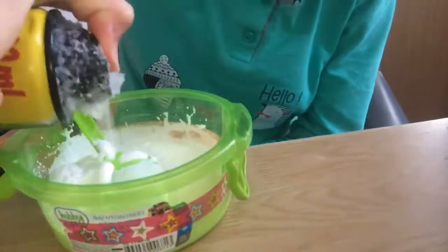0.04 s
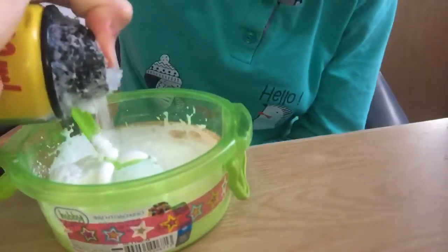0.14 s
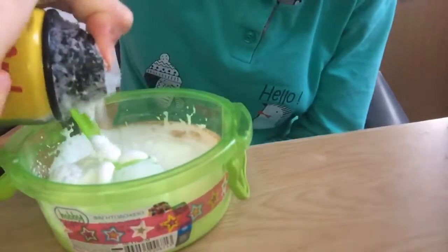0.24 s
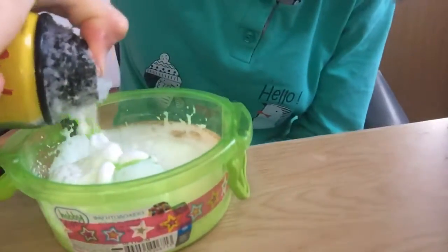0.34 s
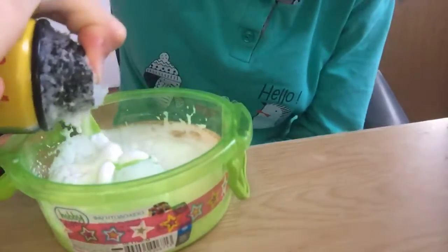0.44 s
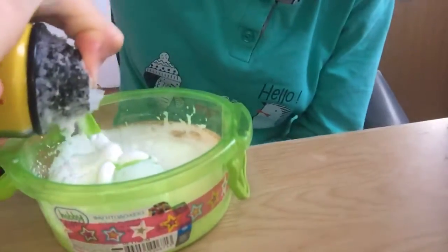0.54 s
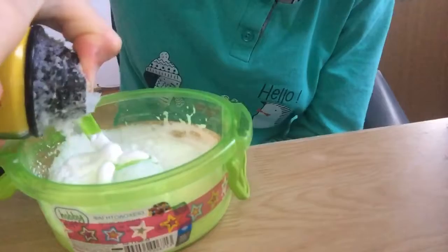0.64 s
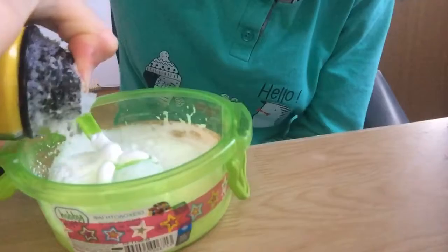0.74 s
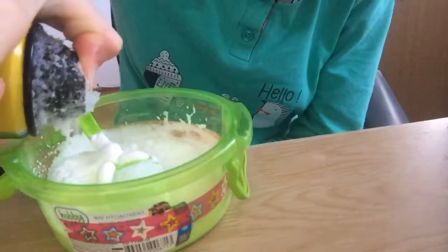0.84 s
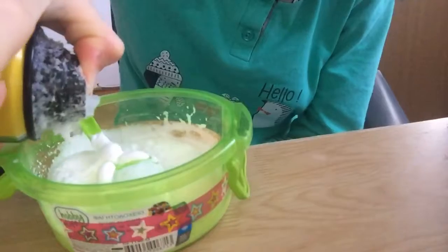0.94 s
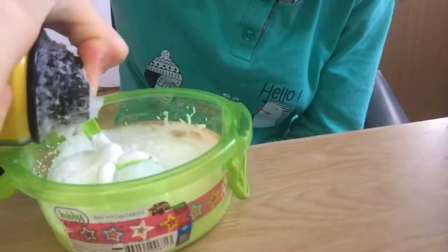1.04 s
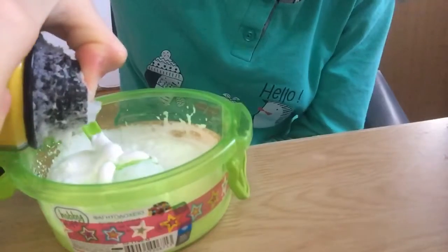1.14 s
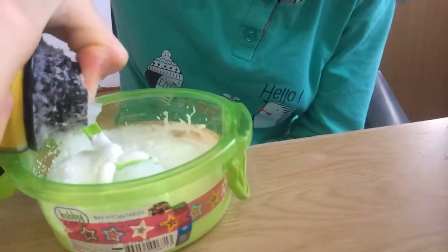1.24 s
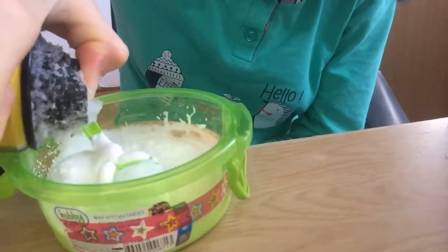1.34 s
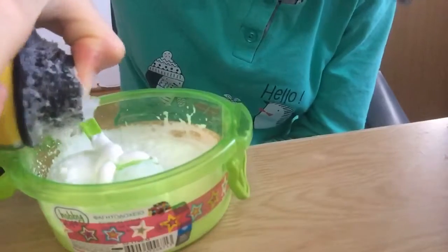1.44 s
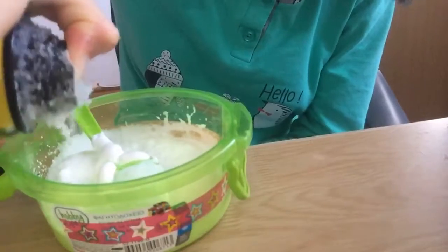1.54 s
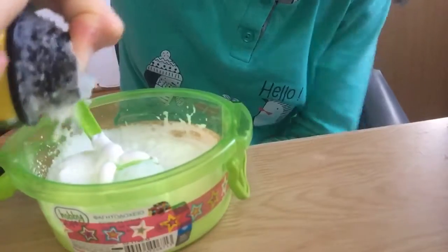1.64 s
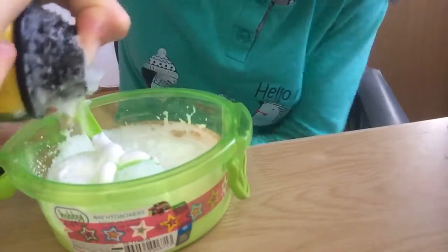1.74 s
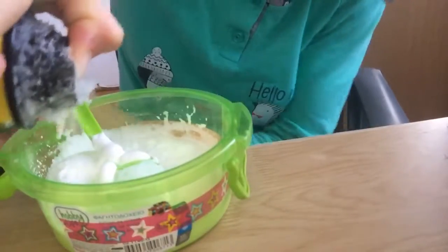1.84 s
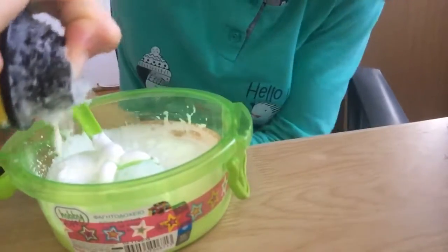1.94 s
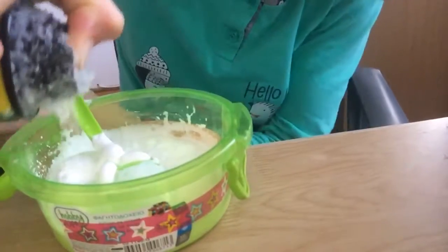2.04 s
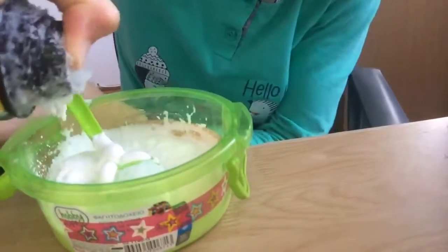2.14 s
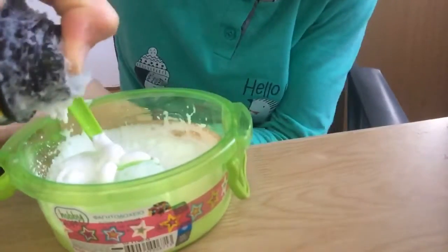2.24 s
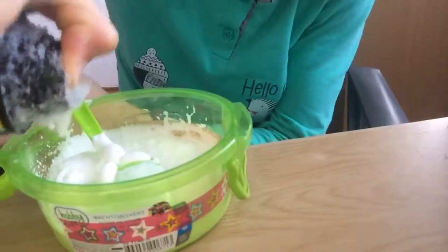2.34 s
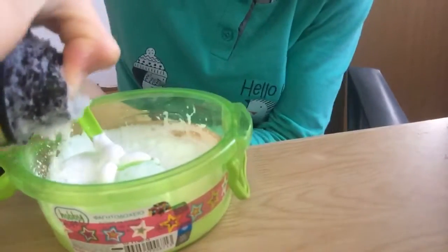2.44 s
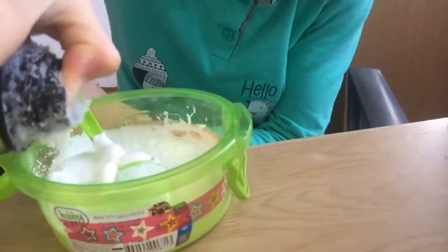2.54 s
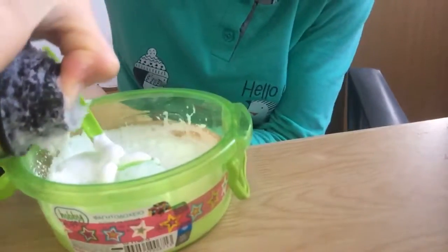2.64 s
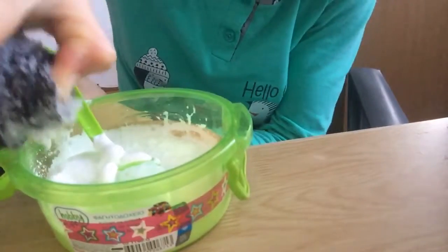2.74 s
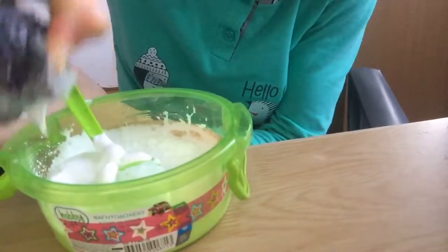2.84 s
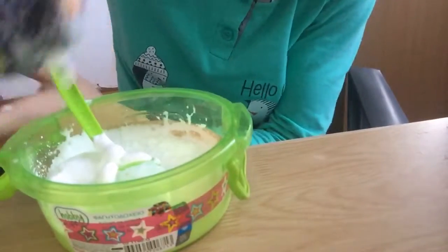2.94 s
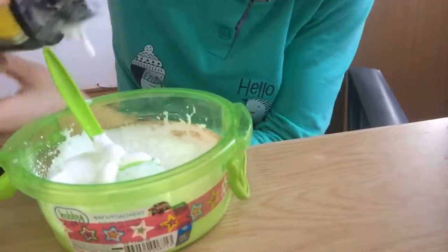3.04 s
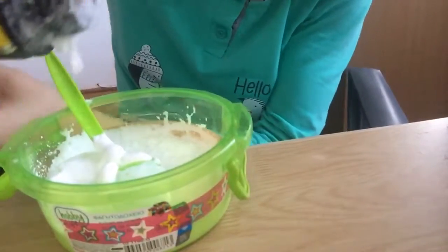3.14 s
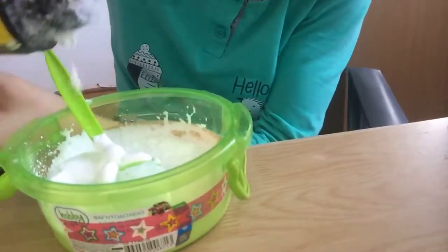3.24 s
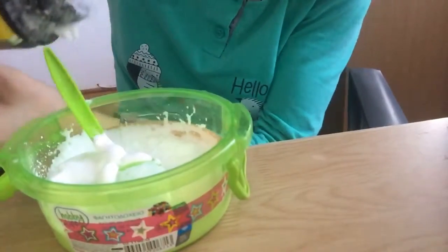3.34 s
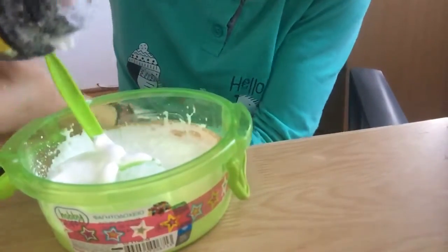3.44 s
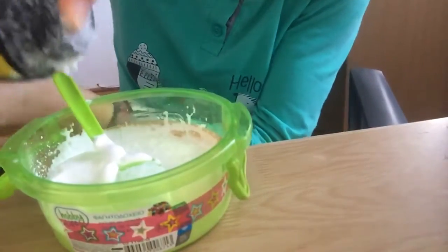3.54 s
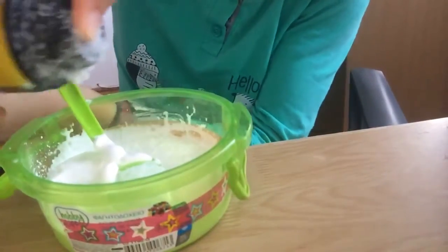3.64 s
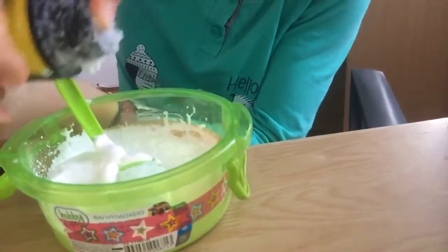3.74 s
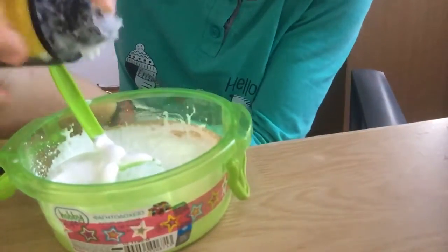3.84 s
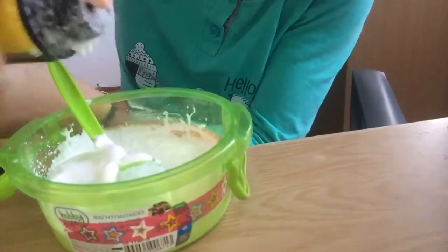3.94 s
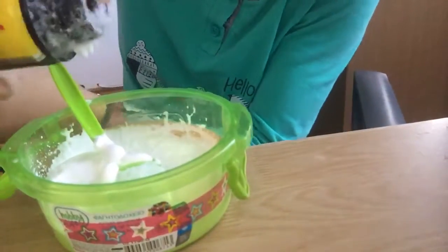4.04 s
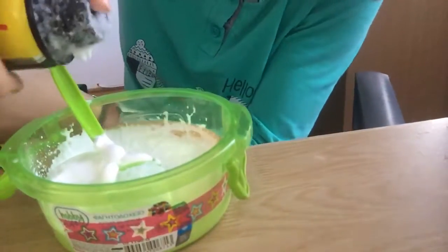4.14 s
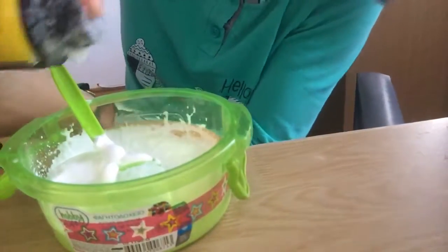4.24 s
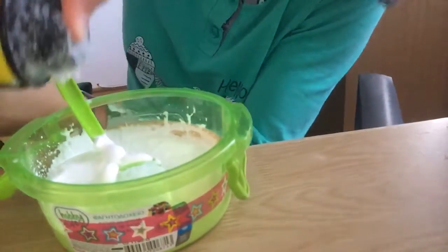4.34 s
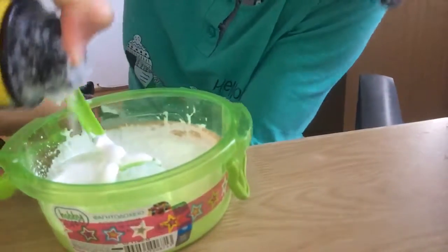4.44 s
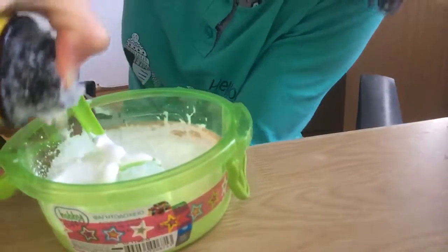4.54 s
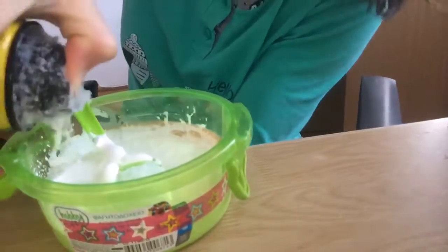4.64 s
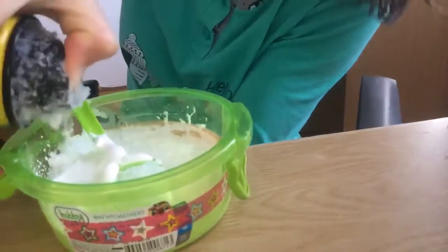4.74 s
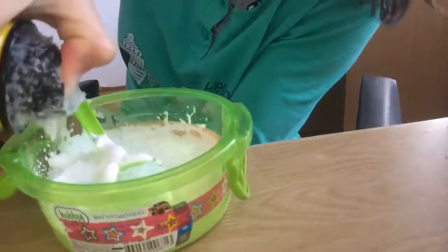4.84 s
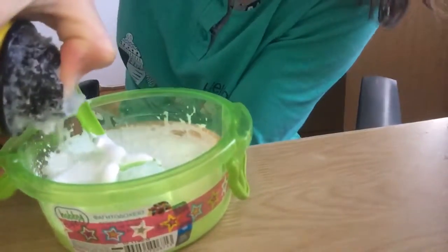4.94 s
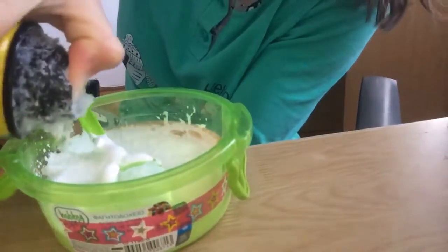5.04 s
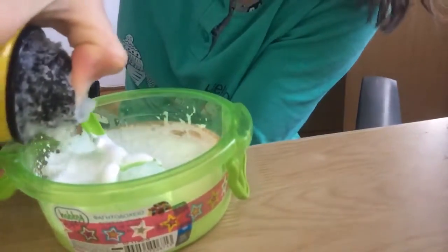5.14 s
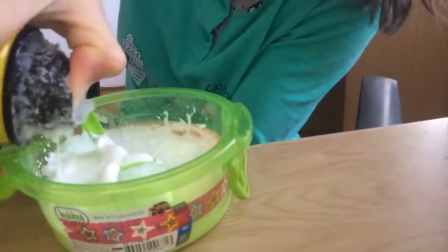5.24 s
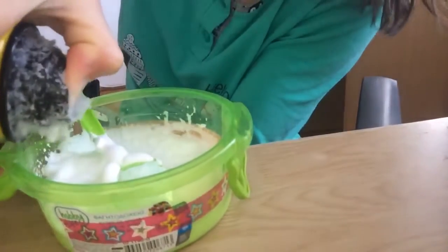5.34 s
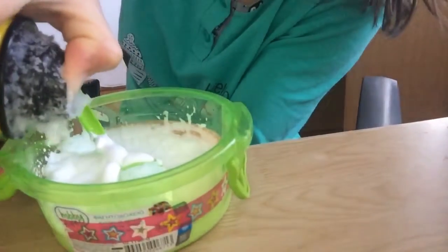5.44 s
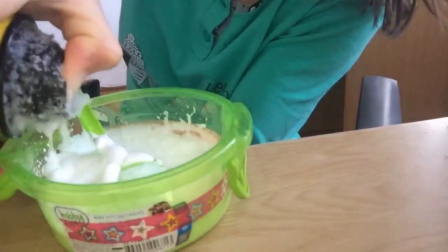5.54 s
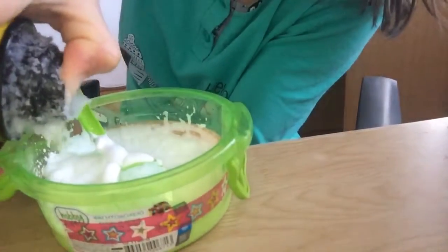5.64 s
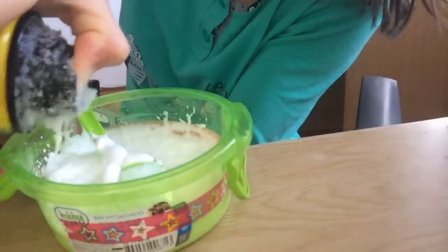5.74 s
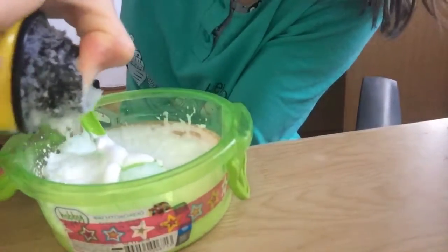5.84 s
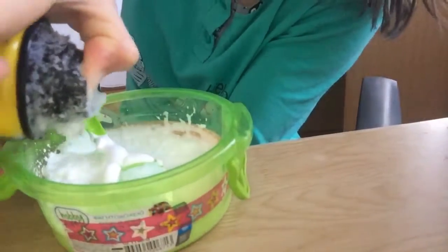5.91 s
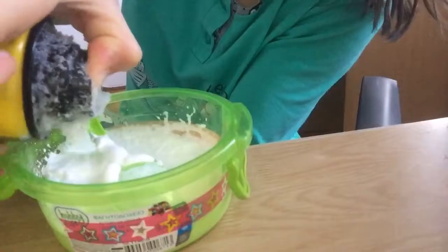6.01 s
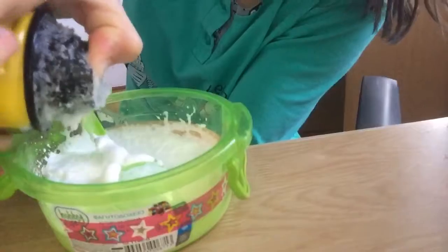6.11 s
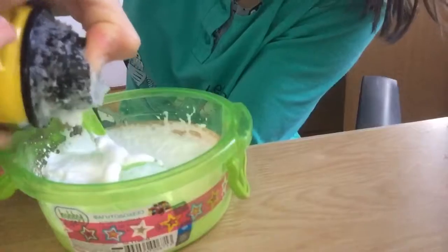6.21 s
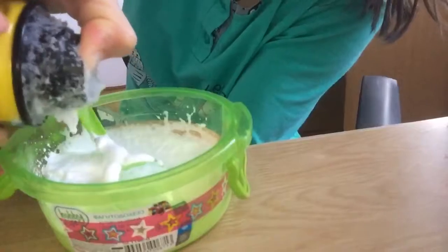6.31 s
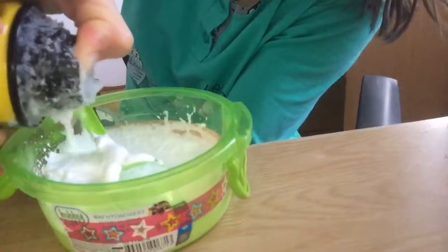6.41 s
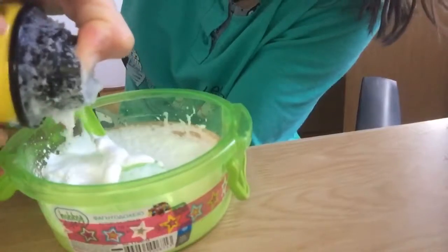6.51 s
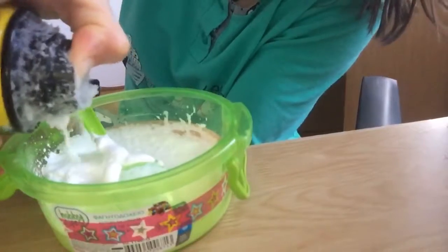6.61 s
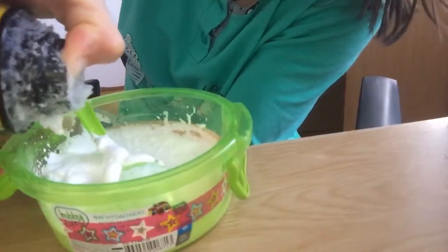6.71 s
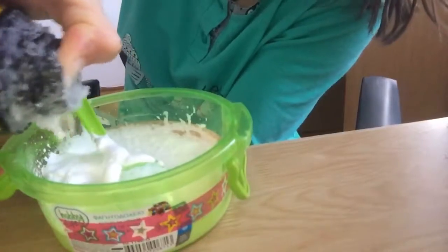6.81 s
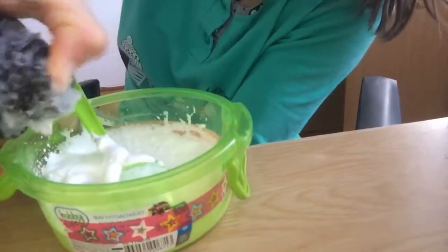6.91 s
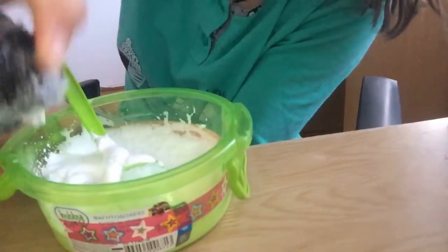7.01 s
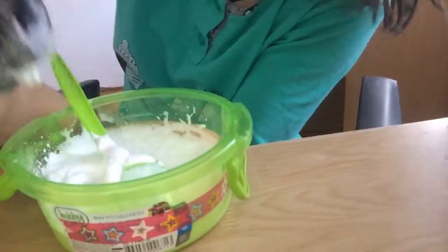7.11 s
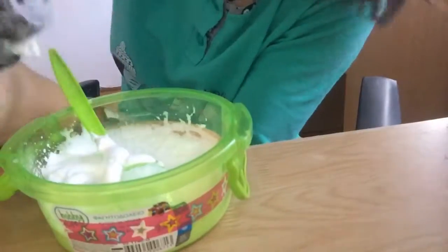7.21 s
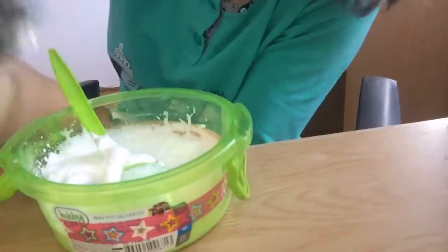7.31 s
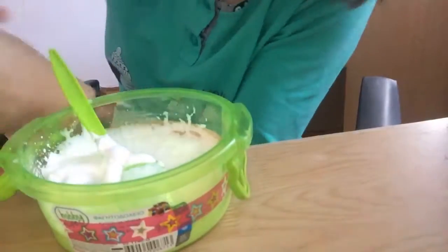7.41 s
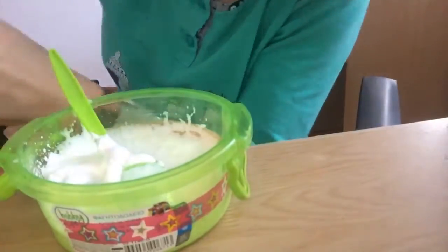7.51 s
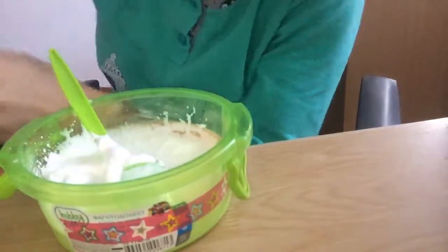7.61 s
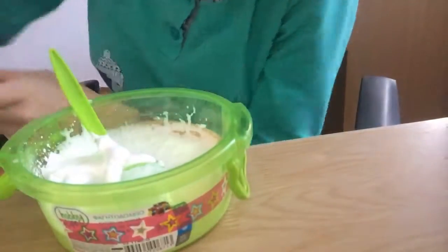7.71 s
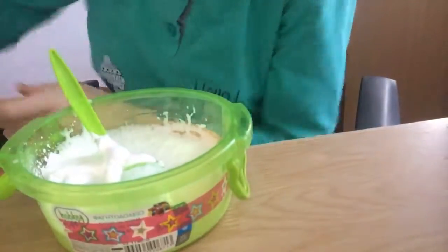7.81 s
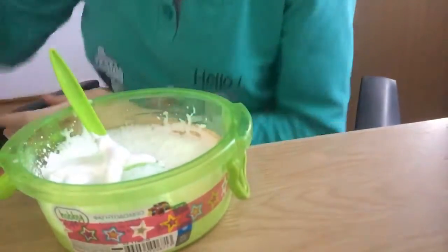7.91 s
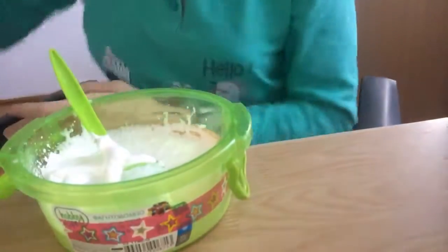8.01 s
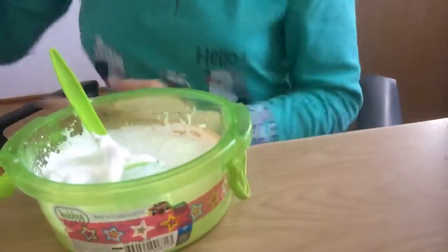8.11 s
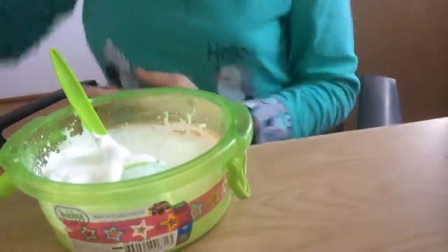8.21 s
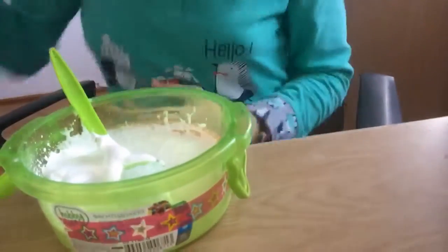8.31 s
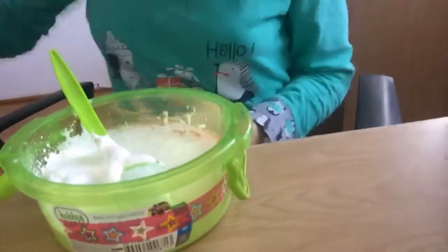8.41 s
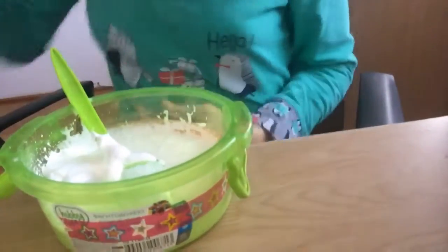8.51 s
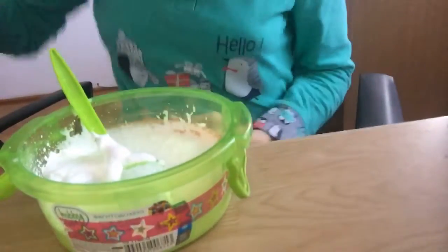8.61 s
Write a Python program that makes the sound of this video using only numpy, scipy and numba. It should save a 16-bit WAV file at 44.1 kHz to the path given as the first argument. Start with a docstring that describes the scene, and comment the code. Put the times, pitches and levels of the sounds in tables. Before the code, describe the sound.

Close, rough spitting of aerosol foam into a bowl, three presses with gaps between, ending in a smoother bright hiss and faint bumps.

```python
"""A nearly empty foam can is pressed three times over a plastic bowl, close to a phone on the table.
Two presses spit: slugs of foam burst at the nozzle over a gas hiss, here coloured noise under envelopes.
Ticks of fingers, cap and foam follow; two short tries lead to a third press that ends as mostly gas hiss.
Last come ticks and dull table bumps, as short rings. Bowl and table return close echoes of the spray that
shift with the hand, a small room adds a noise tail to it; faint room tone and hum lie underneath."""
import sys
import numpy as np
from scipy import signal
from scipy.fft import rfft, irfft
from scipy.io import wavfile
from scipy.ndimage import uniform_filter1d, map_coordinates
from numba import njit

SR = 44100
rng = np.random.default_rng(int(sys.argv[2]) if len(sys.argv) > 2 else 0)


def generate_wav(sig):
    """Save sig (samples, or channels by samples) to the path in sys.argv[1] as 16-bit PCM at SR."""
    pcm = np.round(np.clip(np.atleast_2d(sig).T, -1, 1) * 32767).astype(np.int16)
    wavfile.write(sys.argv[1], SR, pcm)


N = 381986
T = np.arange(N) / SR

# jet noise spectrum: (frequency [Hz], relative density [dB])
JET_SPECTRUM = [(1800, -23.5), (2800, -2.5), (6000, 5), (9800, -1), (10600, -17), (16000, -20.5)]
# foam noise spectrum in the bowl: (frequency [Hz], relative density [dB])
SPLAT_SPECTRUM = [(40, -32.5), (120, -12), (450, -10.5), (700, -2), (1300, -0.9), (2600, -6), (4000, -19),
                  (16000, -49)]
# bowl resonances: (frequency [Hz], width [Hz], relative gain [dB])
BOWL_MODES = [(1240, 640, -7.5), (300, 210, -7.5), (188, 27, -12.5)]
# jet turning into the bowl: (time [s], 2330 Hz bowl mode level [dB], 3440 Hz bowl mode level [dB],
# nozzle resonance before per-slug shift [Hz])
JET_AIM = [(0, -20, -13.5, 6144), (.8, -19.5, -16.5, 7025), (2.099, -7.5, -16.5, 5610),
           (2.7, -10.5, -12.5, 6076), (4.7, -10.5, -0.5, 6943), (5.402, -8, -5, 7110),
           (5.8, -9.5, -10, 6946), (6.1, -12.5, -9, 6340), (6.35, -9.5, -7.5, 6310), (6.9, -2.5, -7, 8280)]


def spray():
    """Turbulent gas and bursting slugs modulate noise coloured by jet, nozzle, top band and bowl."""
    gas, small_re_hiss_db, low_re_hiss_db, top_re_hiss_db = valve()
    slug_s, slug_db, slug_ms = sputter()
    slugs = spits(slug_s, slug_db, slug_ms)

    # a slug chokes the gas just before it bursts
    choke = 1 / (1.5 + 3.1 * bursts(slug_s - 0.005, slug_db, rise_s=0.00145, fall_s=0.0029))
    # flutter is shallower where the hiss is louder
    flutter_db = 2.2 * undb(small_re_hiss_db / 2) * walk(60)
    small = small_spits() * undb(small_re_hiss_db - 6.5)
    flow = gas * (undb(flutter_db) + small) * choke

    # every slug leaves a slightly different opening: colour differs for a moment
    fresh = np.exp(-np.abs(T - held(T, slug_s, slug_s)) / 0.044)
    luck = rng.standard_normal((len(slug_s), 3)).T
    nozzle_shift, low_luck, top_luck = (fresh * held(T, slug_s, c) for c in luck)

    aim_s, *columns = np.transpose(JET_AIM)
    *aim_db, nozzle_hz = (np.interp(T, aim_s, c) for c in columns)

    # foam in the nozzle: broad resonance, weaker as the hiss grows
    nozzle = unit(svf(noise(), nozzle_hz * np.exp(0.11 * nozzle_shift), 1600.0))
    nozzle = nozzle * undb(-5 + 0.39 * small_re_hiss_db)
    jet = undb(-3.5) * colour(noise(), JET_SPECTRUM)
    top = unit(double_band(noise(), 13500, 7100)) * undb(top_re_hiss_db - 7 + 3.3 * top_luck)

    wide = colour(noise(), SPLAT_SPECTRUM)
    modes = sum(undb(db + 4.5) * band(wide, hz, width_hz) for hz, width_hz, db in BOWL_MODES)
    bowl = unit(wide + modes)
    aimed = sum(undb(db) * unit(band(wide, hz, 300)) for db, hz in zip(aim_db, (2330, 3440)))
    bright = double_band(bowl, 1400, 3200) + aimed
    # the bowl answers slugs more softly, smeared over 2.5 ms
    splat = undb(-13.5 + 1.5 * low_luck) * uniform_filter1d(slugs, size=110, origin=50)

    high_part = (jet + nozzle + top) * (flow + undb(-6) * slugs)
    low_part = (bowl + aimed) * flow + bright * splat
    return high_part + undb(low_re_hiss_db) * low_part


# valve presses; rows 3 and 4 are short tries before the third:
# (opening time [s], shutting time [s], relative level [dB], rise time constant [s])
PRESSES = [(-.01, 2.188, 1.5, .002), (2.487, 2.912, 1, .002), (4.471, 4.488, -9.5, 0.0072),
           (4.499, 4.512, -4, .002), (4.544, 7.0, -0.5, .09)]
# gas through the foam: (time [s], hiss level [dB], relative top band level re hiss [dB])
GAS = [(0, -22.5, -26.5), (.3, -24.5, -11.5), (1.2, -30, -8), (1.7, -26, -5), (2.2, -23.5, -9),
       (2.5, -25.5, -17), (2.75, -28, -17), (2.9, -25, -8), (4.6, -29.5, -34), (5.0, -29, -8),
       (6.1, -28, -10), (6.23, -23, -8), (6.35, -24.5, 5), (6.7, -21, 2), (7.0, -22, 4.5)]
SHUT_S = 0.009
# base levels; in the gas flow they cancel the hiss level
SMALL_DB, LOW_DB = -28, -32.5


def valve():
    """Gas gain: exponential opening, Gaussian shutting, hiss track; and the levels set against it."""
    opening = np.zeros(N)
    for open_s, shut_s, db, rise_s in PRESSES:
        rise = 1 - np.exp(-np.maximum(T - open_s, 0) / rise_s)
        fall = np.exp(-(np.maximum(T - shut_s, 0) / SHUT_S) ** 2)
        opening += undb(db) * rise * fall
    gas_s, *columns = np.transpose(GAS)
    hiss_db, top_re_hiss_db = (np.interp(T, gas_s, c) for c in columns)
    return opening * undb(hiss_db), SMALL_DB - hiss_db, LOW_DB - hiss_db, top_re_hiss_db


# clear spits, mostly loud: (time [s], relative level [dB])
CLEAR_SPITS = [(0.0084, -3), (0.0258, -1.5), (0.0373, 0), (0.0419, -0.5), (0.0494, -2), (0.0593, -4),
               (0.0893, -2), (0.1074, -6), (0.1505, -10), (0.2055, -5), (0.2291, -4), (0.2384, -5),
               (0.2613, -2), (0.2952, -3.5), (0.317, -5.5), (0.3664, -9.5), (0.4164, -10), (0.4324, -6.5),
               (0.4644, -5), (0.4924, -3), (0.5162, -5), (0.5688, -6), (0.5904, -6), (0.6669, -2),
               (0.6833, -4), (0.7023, -4.5), (0.7434, -2), (0.7554, -4.5), (0.7779, -5), (0.816, -4),
               (0.831, -3), (0.852, -3), (0.8779, -6), (0.9068, -3.5), (0.9579, -3), (0.9827, -1),
               (1.039, -4.5), (1.0575, -5.5), (1.0939, -7.5), (1.1506, -6), (1.1891, -6.5), (1.2082, -3.5),
               (1.266, -3), (1.316, -0.5), (1.3342, 0), (1.3617, -6), (1.4052, -4.5), (1.4336, -6),
               (1.5154, -6.5), (1.5502, -4.5), (1.5733, -4), (1.6042, -2), (1.6184, -3), (1.7041, 0.5),
               (1.75, -6), (1.7654, -6), (1.831, -5), (1.8733, -1.5), (1.8854, -4.5), (1.9047, -1),
               (1.9493, -1.5), (1.9901, -2), (2.0064, -5), (2.0245, 0), (2.0387, -4), (2.0577, -2),
               (2.0981, -2), (2.1151, -2.5), (2.1317, -1), (2.161, -4), (2.1864, -9), (2.4895, -11.5),
               (2.4974, -7.5), (2.5087, -0.5), (2.528, 0.5), (2.5424, -2.5), (2.5537, -3), (2.5781, 1),
               (2.59, 0), (2.6367, -3.5), (2.6812, -6), (2.7062, -6), (2.73, -2), (2.7675, -2.5),
               (2.802, -3), (2.828, -8), (2.8419, 0.5), (2.8844, -6), (4.5004, -11.5), (4.5463, 0),
               (4.5757, -12.5), (4.593, -5.5), (4.604, -7.5), (4.6188, -1), (4.6457, -2.5), (4.6664, -5.5),
               (4.6936, -6), (4.7141, -5), (4.746, -4), (4.779, -4.5), (4.8028, -3.5), (4.8318, -6.5),
               (4.8633, -6.5), (4.8735, -3), (4.8913, -3.5), (4.9136, -5.5), (4.9224, -7), (4.9516, -5.5),
               (4.9712, -12.5), (5.0082, -5), (5.025, -5.5), (5.0626, -4.5), (5.0786, -4), (5.1007, -4),
               (5.1166, -3), (5.1387, -9), (5.2081, -5.5), (5.235, -2.5), (5.2653, -6), (5.2928, -1.5),
               (5.3498, -4.5), (5.3759, -2.5), (5.3932, -2), (5.4405, -7.5), (5.4719, -1), (5.5225, -1),
               (5.5538, -2.5), (5.5656, 1.5), (5.5882, -6), (5.6398, -4.5), (5.6655, -8.5), (5.7009, -3.5),
               (5.7231, 1), (5.7517, -5), (5.777, -1.5), (5.7939, -4), (5.8117, -1.5), (5.8336, -5),
               (5.8531, -3), (5.88, -5.5), (5.9186, -8.5), (5.9412, -3), (5.9565, -5), (5.9852, -3),
               (6.0089, -5.5), (6.0372, -9), (6.0677, -1), (6.1135, -4), (6.1495, -2), (6.1724, -3),
               (6.1878, -4.5), (6.2048, 3), (6.2152, -4.5), (6.2214, -5), (6.2264, 0.5), (6.2493, -11),
               (6.2756, -9.5)]
# mostly weaker spits, nearly evenly filling the gaps
FILL_S, FILL_SCATTER_S, FILL_DB, FILL_SCATTER_DB = 0.017, 0.0022, -10.5, 1.5
# louder spits are shorter: median length at -5 dB, slope, log-normal scatter
SPIT_MS, SPIT_MS_PER_DB, SPIT_SCATTER = 3.44, -0.2048, 0.2


def sputter():
    """Times [s], levels [dB], lengths [ms] of spits: placed ones and mostly weaker ones between."""
    s, db = np.transpose(CLEAR_SPITS)
    between = []
    for a, b in zip(s, s[1:]):
        if any(open_s < a and b < shut_s for open_s, shut_s, *_ in PRESSES):
            steps = max(round((b - a) / FILL_S), 1)
            between.extend(np.linspace(a, b, steps + 1)[1:-1])
    count = len(between)
    late, luck_db, length_luck = rng.standard_normal((600, 3)).T
    s = np.append(s, np.array(between) + FILL_SCATTER_S * late[:count])
    db = np.append(db, FILL_DB + FILL_SCATTER_DB * luck_db[:count])
    ms = (SPIT_MS + SPIT_MS_PER_DB * (db + 5)) * np.exp(SPIT_SCATTER * length_luck[:len(s)])
    order = np.argsort(s)
    return s[order], db[order], ms[order].clip(1)


def spits(s, db, ms):
    """Envelope of slugs: each cracks open, holds, sags and stutters once more, by a random amount."""
    out = np.zeros(N)
    t_ms = T[:1500] * 1000
    chance = rng.random((len(s), 2))
    for at, peak, span_ms, (late, size) in zip((s * SR).astype(int), undb(db), ms, chance):
        burst = (1 - np.exp(-t_ms / (0.28 * span_ms))) * np.exp(-(t_ms / (0.85 * span_ms)) ** 2)
        crack = 0.46 * np.exp(-((t_ms - 0.8) / 0.3) ** 2)
        stutter_ms = span_ms + 1.5 + 1.8 * late
        stutter = (0.16 + 0.23 * size) * np.exp(-((t_ms - stutter_ms) / 0.86) ** 2)
        sag = 0.1 * np.exp(-t_ms / 3.3)
        out[at:at + len(t_ms)] += peak * (burst + crack + stutter + sag)
    return out


def small_spits():
    """Envelope of 1500 tiny bursts at random times, with exponentially distributed dB levels."""
    when, luck = rng.random((1500, 2)).T
    return bursts(when * N / SR, -4 * np.log(luck + 1e-4), rise_s=0.00026, fall_s=0.0012)


# two hollows gliding as the can tilts: (time [s], lower centre [Hz], upper centre [Hz])
HOLLOW_TRACKS = [(0, 2650, 9250), (1.1, 2700, 8600), (1.35, 2800, 7950), (1.55, 2920, 7300),
                 (2.1, 3000, 6670), (2.7, 4220, 7420), (4.7, 5000, 8600), (5.0, 5000, 8200),
                 (5.3, 5000, 7700), (5.8, 5000, 7540), (6.2, 3000, 7300), (6.4, 2940, 8400),
                 (7.0, 3010, 8600)]
HOLLOW_WIDTH_HZ, HOLLOW_DEPTH = 750.0, 0.46  # depth: share of amplitude removed at the centre


def hollow(x):
    """Subtracts part of two narrow, moving bands."""
    s, *tracks_hz = np.transpose(HOLLOW_TRACKS)
    for hz in tracks_hz:
        x = x - HOLLOW_DEPTH * svf(x, np.interp(T, s, hz), HOLLOW_WIDTH_HZ)
    return x


# can moving over the bowl: (time [s], nearest lag [ms], nearest gain [ratio],
# next lag [ms], next gain [ratio])
HAND_ECHOES = [(0.15, 0.244, 0.33, 0.374, -0.34), (0.7, 0.268, 0.34, 0.357, -0.2),
               (1.2, 0.301, 0.43, 0.353, -0.11), (1.55, 0.223, 0.28, 0.34, 0.34),
               (2.0, 0.235, 0.48, 0.343, 0.25), (2.6, 0.312, -0.29, 0.34, 0.43),
               (2.82, 0.185, 0.3, 0.351, 0.48), (4.7, 0.273, 0.47, 0.61, -0.21),
               (5.0, 0.293, 0.53, 0.613, -0.17), (5.35, 0.325, 0.54, 0.702, 0.18),
               (5.7, 0.34, 0.23, 0.728, 0.18), (6.05, 0.33, 0.05, 0.74, 0.21),
               (6.45, 0.313, 0.24, 0.705, -0.22), (6.85, 0.292, 0.1, 0.577, -0.33)]
# fixed reflections off bowl and table: (lag [ms], gain [ratio])
STILL_ECHOES = [(.84, .2), (1.065, -.19), (1.36, -0.016)]


def near_echoes(x):
    """Direct sound plus close reflections: two follow the hand, three stay in place."""
    s, *columns = np.transpose(HAND_ECHOES)
    near_ms, near_gain, next_ms, next_gain = (np.interp(T, s, c) for c in columns)
    moving = near_gain * echo(x, near_ms) + next_gain * echo(x, next_ms)
    still = sum(gain * echo(x, lag_ms) for lag_ms, gain in STILL_ECHOES)
    return x + moving + still


def echo(x, lag_ms):
    """Copy delayed by a fixed or moving lag; spline smoothing softens its treble."""
    return map_coordinates(x, [np.arange(N) - lag_ms * SR / 1000], order=3, prefilter=False)


# fingers, cap and foam ticking:
# (time [s], relative level [dB], ring frequency [Hz], width [Hz], t60 [s])
TICKS = [(3.359, -61, 2794, 900, 0.042), (3.792, -50, 9500, 7000, .012), (3.913, -54, 5000, 4970, 0.014),
         (4.073, -52, 2600, 600, 0.028), (4.073, -54, 7000, 4000, .03), (4.347, -47, 2790, 2000, 0.011),
         (4.449, -42.5, 2520, 3000, 0.011), (7.159, -23, 830, 330, 0.016), (7.159, -46, 3500, 6900, 0.017),
         (7.313, -53, 4500, 12000, 0.026), (7.511, -48.5, 6020, 14000, .025),
         (7.511, -50, 1390, 700, 0.033), (8.36, -57, 6000, 5000, 0.18), (8.49, -58, 4000, 9000, 0.2)]
# arm and chair bumping the table: (time [s], relative level [dB], ring frequency [Hz], t60 [s])
BUMPS = [(2.768, -29, 108, 0.087), (7.519, -56, 67, .15), (8.11, -53, 330, 0.3), (8.171, -46, 81, 0.13),
         (8.293, -49, 325, 0.26), (8.447, -48, 148, 0.31), (8.53, -48, 136, 0.24), (8.62, -53.5, 351, 0.24)]


def knocks():
    """Bright ticks and dull bumps: decaying rings, tonal when narrow and noisy when wide."""
    out = np.zeros(N)
    t = T[:8000]
    bumps = [(s, db, hz, hz * 0.79, t60_s) for s, db, hz, t60_s in BUMPS]
    for s, db, hz, width_hz, t60_s in [*TICKS, *bumps]:
        noisy = min(width_hz / hz, 1)
        rough = unit(double_band(rng.standard_normal(len(t)), hz, width_hz))
        tone = np.sqrt(2) * np.sin(2 * np.pi * hz * t)
        ring = noisy * rough + (1 - noisy) * tone
        ring = ring * decay(t, t60_s) * np.minimum(t / (0.094 * t60_s), 1)
        i = int(s * SR)
        out[i:i + len(t)] += (undb(db - 2) * ring)[:N - i]
    return out


# small room decay bands: (frequency [Hz], t60 [s], relative level [dB])
WALL_BANDS = [(475, 0.27, -22), (1551, .47, -15.5), (3700, 0.39, -12), (8150, 0.61, -22), (13200, 0.2, -16)]


def walls(x):
    """Diffuse tail: convolution with noise dying away band by band, faded in after the first wall."""
    t = T[:SR // 2]
    tail = np.zeros(len(t))
    for hz, t60_s, db in WALL_BANDS:
        hiss = double_band(rng.standard_normal(len(t)), hz, hz)
        tail += undb(db) * unit(hiss * decay(t, t60_s))
    fade_in = np.clip(t / 0.0027 - 0.3, 0, 1)
    tail = tail * fade_in / np.sqrt(len(t) * len(WALL_BANDS))
    return signal.fftconvolve(x, tail)[:N]


# room tone spectrum: (frequency [Hz], relative density [dB])
ROOM_SPECTRUM = [(25, -27), (55, -13), (120, -12), (250, -12), (500, -18.5), (2300, -23.5), (9000, -32),
                 (10500, -36), (16000, -39)]
ROOM_DB = -68.5


def room_tone():
    """Coloured noise whose level drifts slightly."""
    return colour(noise(), ROOM_SPECTRUM) * undb(ROOM_DB + 0.6 * walk(8.8))


# murmur of appliances: (frequency [Hz], width [Hz], level [dB])
HUM_BANDS = [(57, 14, -79.5), (177, 10, -75), (220, 11, -79.5)]


def hum():
    """Appliance murmur as narrow bands of noise."""
    return sum(undb(db) * unit(double_band(noise(), hz, width_hz)) for hz, width_hz, db in HUM_BANDS)


def undb(db):
    """Amplitude gain of a level in dB."""
    return 10 ** (np.asarray(db) / 20)


def unit(x):
    """Scaled to rms 1."""
    return x / np.sqrt(np.mean(x ** 2))


def noise():
    """White noise."""
    return rng.standard_normal(N)


def decay(t, t60_s):
    """Exponential decay, 60 dB down after t60."""
    return np.exp(-np.log(1000) * t / t60_s)


@njit
def svf(x, hz, width_hz):
    """State-variable band-pass with a movable centre, gain 1 there."""
    y, b, l = np.empty(len(x)), 0., 0.
    for i in range(len(x)):
        g, k = np.tan(np.pi * hz[i] / SR), width_hz / hz[i]
        v = (b + g * (x[i] - l)) / (1 + g * (g + k))
        b, l, y[i] = 2 * v - b, l + 2 * g * v, k * v
    return y


def band(x, hz, width_hz):
    """Fixed band-pass."""
    return svf(x, np.full(len(x), float(hz)), float(width_hz))


def double_band(x, hz, width_hz):
    """Fixed band-pass applied twice, for steeper skirts."""
    return band(band(x, hz, width_hz), hz, width_hz)


def colour(x, points):
    """Spectrum shaped along (frequency [Hz], level [dB]) points, then scaled to rms 1."""
    hz, db = np.transpose(points)
    bins_hz = np.arange(N // 2 + 1) * SR / N + 1  # +1 avoids log(0)
    gain = undb(np.interp(np.log(bins_hz), np.log(hz), db))
    return unit(irfft(rfft(x) * gain, N))


def bursts(s, db, rise_s, fall_s):
    """Envelope with a quick rise and an exponential fall at each time."""
    kicks = np.zeros(N)
    np.add.at(kicks, np.clip((np.asarray(s) * SR).astype(int), 0, N - 1), undb(db))
    t = T[:4000]
    shape = np.exp(-t / fall_s) - np.exp(-t / rise_s)
    return signal.fftconvolve(kicks, shape / shape.max())[:N].clip(0)


def walk(rate_hz):
    """Random levels drawn at a rate, with linear slews between them."""
    k = int(SR / rate_hz)
    return uniform_filter1d(np.repeat(rng.standard_normal(N // k + 1), k), k)[:N]


def held(t, s, values):
    """Value of the latest event, held until the next."""
    return values[np.clip(np.searchsorted(s, t) - 1, 0, len(s) - 1)]


def scene():
    """Spray with echoes and room tail, knocks, room tone and hum."""
    jet = hollow(spray())
    return (near_echoes(jet) + walls(jet) + knocks() + room_tone() + hum())[None]


TOP_HZ = 15700


def record(dry):
    """The phone drops the deepest bass, rounds the loudest peaks and cuts the top."""
    bass_cut = signal.butter(3, 45, "high", fs=SR, output="sos")
    top_cut = signal.ellip(12, 0.2, 80, TOP_HZ, fs=SR, output="sos")
    rounded = np.tanh(0.75 * signal.sosfilt(bass_cut, dry)) / 0.75
    return signal.sosfilt(top_cut, rounded)


dry = scene()
out = record(dry)
generate_wav(out)
```